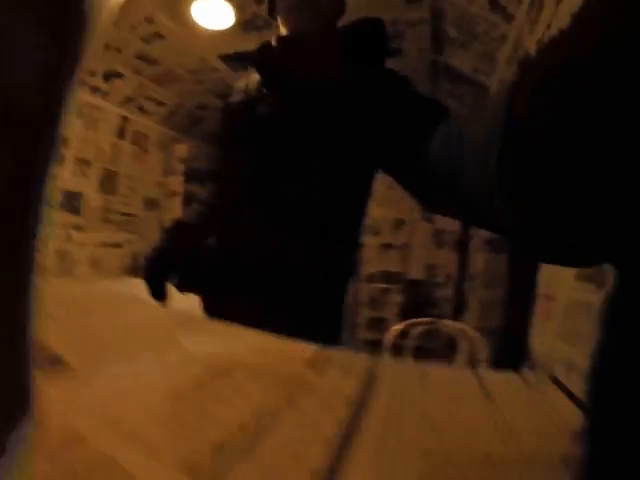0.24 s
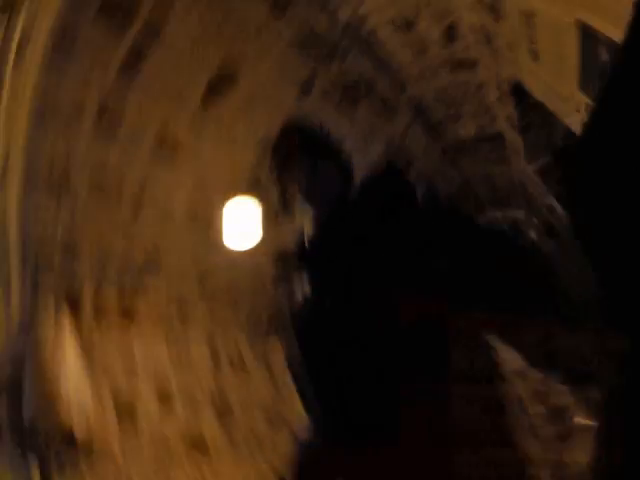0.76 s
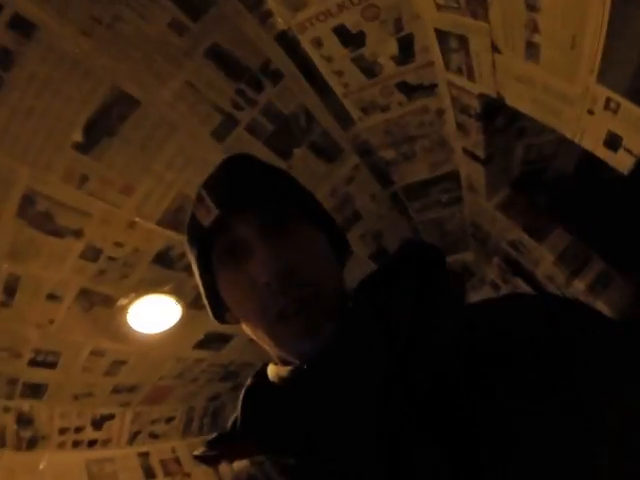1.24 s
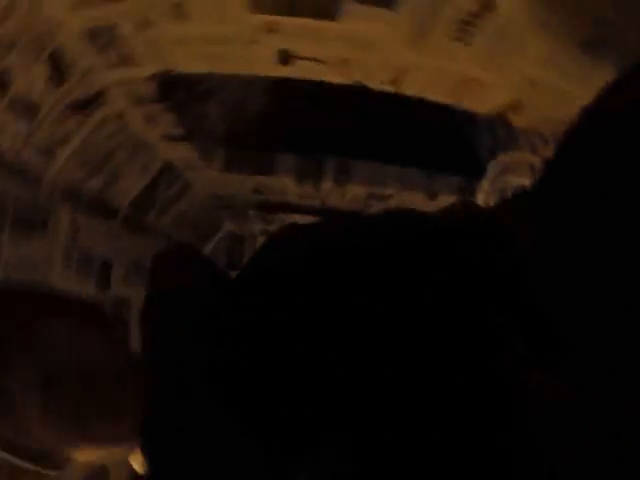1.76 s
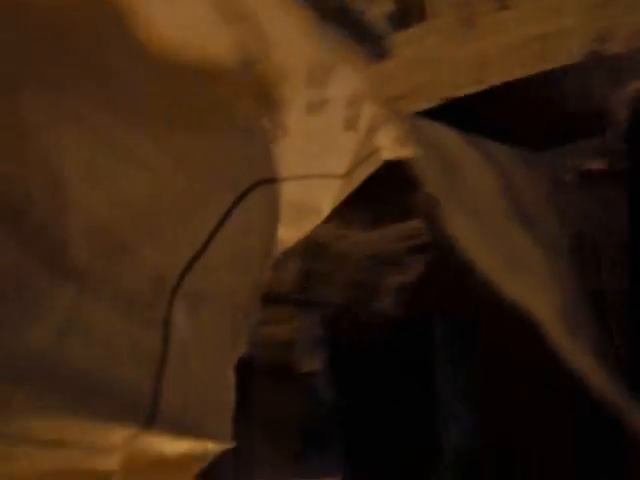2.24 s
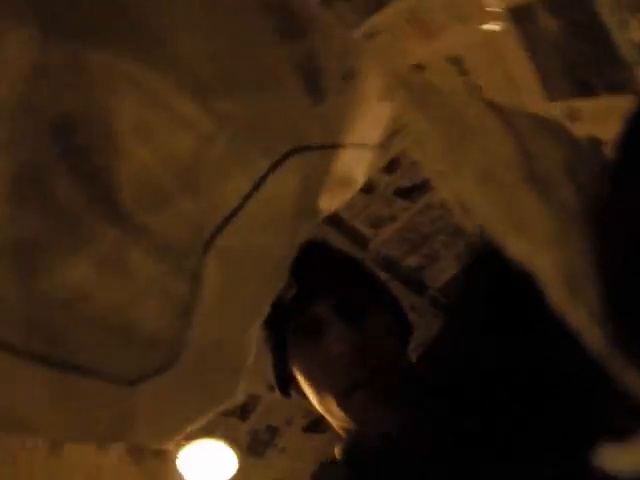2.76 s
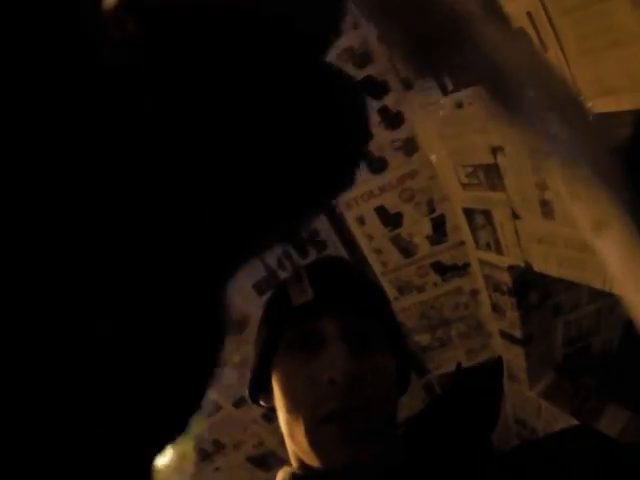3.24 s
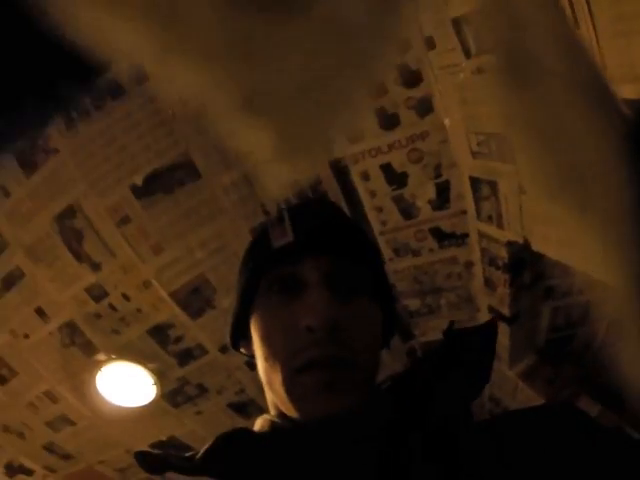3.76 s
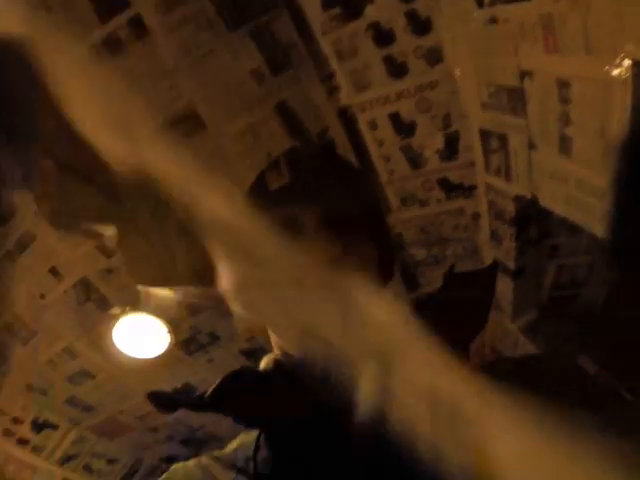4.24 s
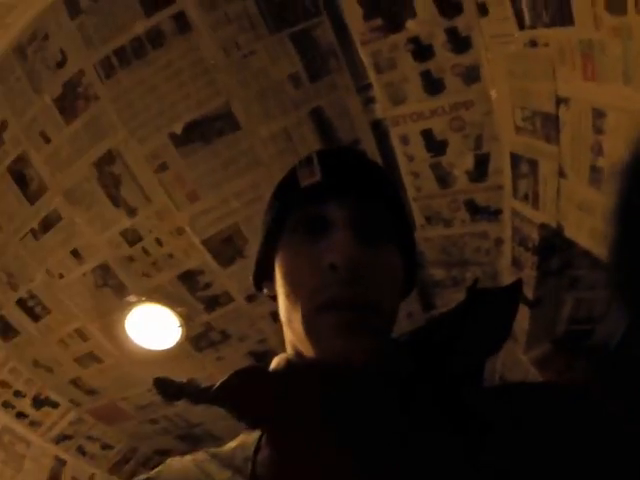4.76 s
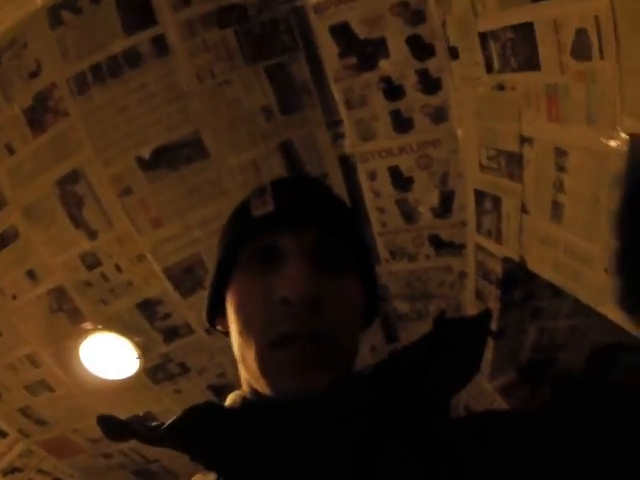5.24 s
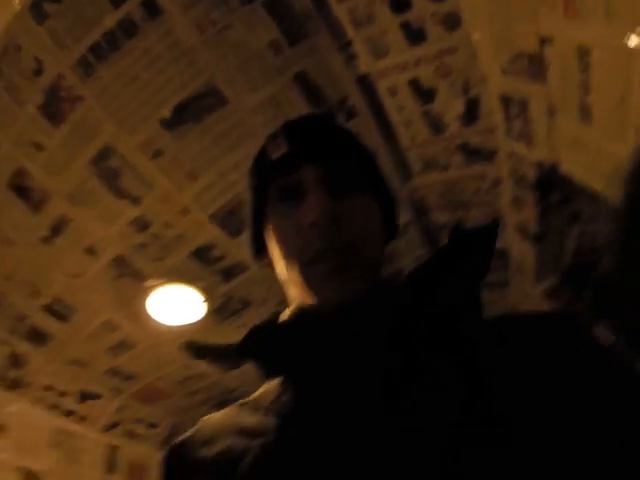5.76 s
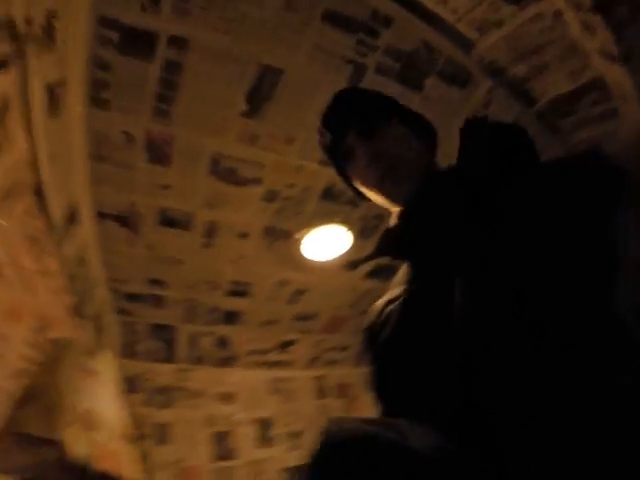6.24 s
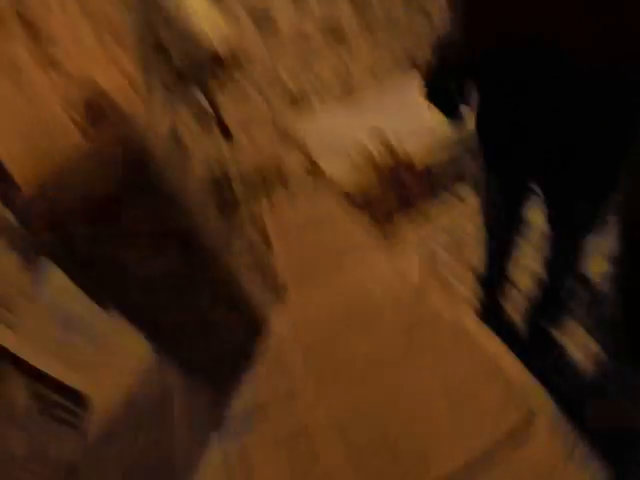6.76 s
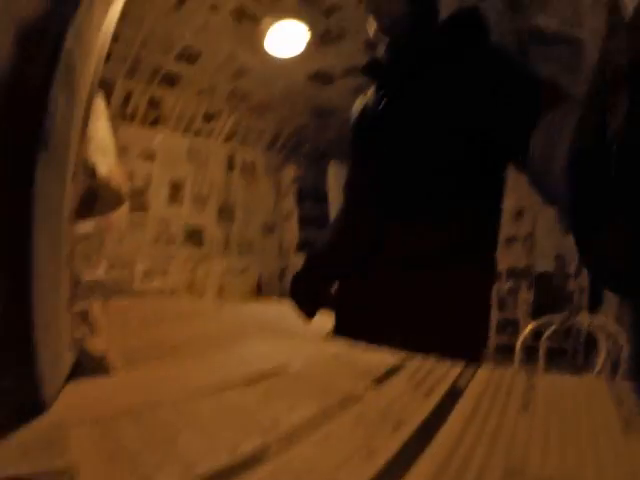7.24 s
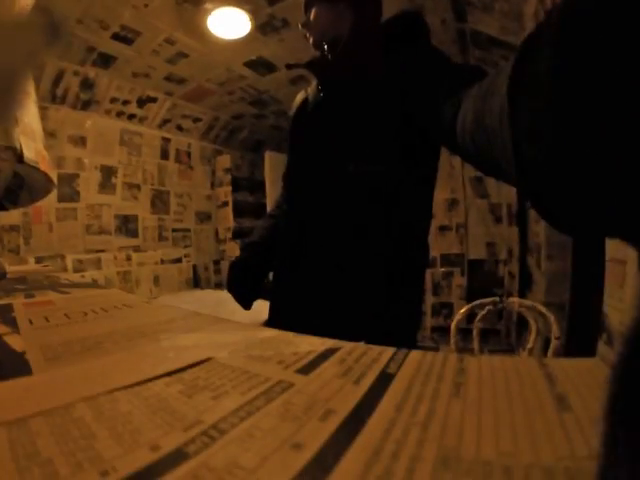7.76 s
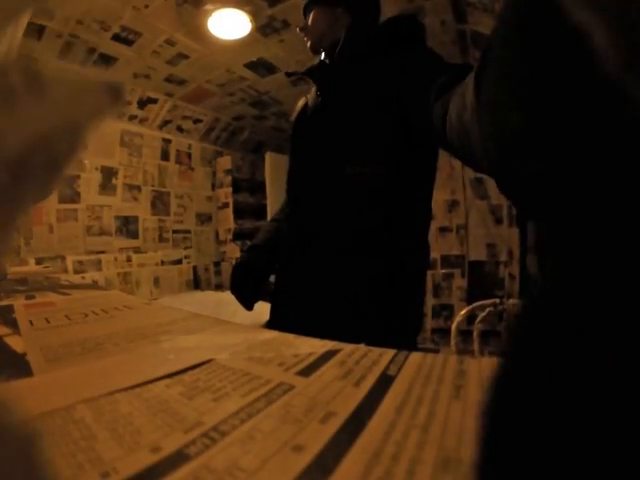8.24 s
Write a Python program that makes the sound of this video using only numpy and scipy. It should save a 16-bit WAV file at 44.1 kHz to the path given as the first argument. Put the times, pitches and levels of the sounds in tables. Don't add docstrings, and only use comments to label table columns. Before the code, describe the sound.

Dry paper crackles and scrapes within a hand's width of the microphone. Creases snap, bulges pop dully and stiff folds knock on the hollow housing, in irregular bursts with short near-quiet gaps. The middle is densest and duller as the port is covered; later come brighter, scattered rustles and bumps. Small room, faint hiss, background dipping after loud snaps.

```python
import sys
import numpy as np
from scipy import signal
from scipy.io import wavfile

SR = 44100
rng = np.random.default_rng(int(sys.argv[2]) if len(sys.argv) > 2 else 0)


def output_pcm(signal):
    pcm = np.clip(np.atleast_2d(signal).T, -1, 1) * 32767
    wavfile.write(sys.argv[1], SR, np.round(pcm).astype(np.int16))


def amplitude_ratio(level_db):
    exponent = np.asarray(level_db, float) / 20
    return 10 ** exponent


N = 374850


# peak time in seconds, housing thud in dB,
# sheet body in dB, crisp edge in dB, airy top in dB against the edge.
SNAPS = [(.243, -26, -13.5, -17, -7.5), (.855, -28, -33, -25.5, -23), (1.526, -21, -16, -18, -8.5),
         (1.751, -25.5, -25.5, -25, -6), (1.798, -20, -21.5, -26, -13), (2.035, -25.5, -31, -24, -21),
         (2.049, -10, -15, -18.5, -15), (2.155, -13, -19, -17, -15), (2.37, -29, -20.5, -22.5, -22),
         (2.448, -22.5, -23, -25.5, -11), (2.925, -29.5, -10.5, -34, -20), (3.0, -19, -5.5, -22, -26),
         (3.011, -25, -13, -20, -18), (3.047, -14, -14.5, -17, -11), (3.144, -14, -13.5, -15.5, -21),
         (3.196, -19, -6, -14, -21), (3.208, -45, -13, -18, -16), (3.771, -23, -17, -15, -16),
         (3.958, -27, -15.5, -27.5, -16), (4.427, -22, -16, -27, -23), (4.543, -6.5, -10.5, -15.5, -19),
         (4.91, -45, -23, -27, -14), (5.245, -34, -19, -27, -13), (5.294, -24, -23, -19.5, -13.5),
         (5.404, -25, -16, -28, -18), (6.379, -12, -13, -22, -15), (7.225, -16.5, -16, -19.5, -13),
         (7.236, -21.5, -23.5, -17.5, -25), (7.436, -33, -29, -19, -40), (7.459, -31.5, -21, -18, -11),
         (7.896, -6, -13, -22.5, -17), (4.653, -20, -31, -26, -5.5), (5.624, -17, -17.5, -30, -24),
         (.701, -18.5, -31, -38, -3), (7.202, -24.5, -36, -31.5, -6)]


def snaps():
    return [(*row, 1) for row in SNAPS]


# peak time in seconds, housing thud in dB, sheet body in dB,
# crisp edge in dB, airy top in dB against the edge.
FOLDS = [(.875, -33, -41, -29.5, -24), (1.584, -15.5, -20, -29.5, -14), (1.621, -10.5, -20, -27, -13),
         (1.663, -15, -23, -36, -2), (1.807, -14, -22, -24.5, -15), (1.943, -9.5, -17, -46, -17),
         (1.975, -30, -26.5, -35.5, -20), (2.267, -11, -14, -16.5, -16.5), (2.984, -21, -33, -31, -21),
         (3.08, -37, -15.5, -36.5, -10), (3.16, -42, -12.5, -21, -13), (3.172, -40, -17, -22.5, -15),
         (3.33, -32, -18.5, -22, -12), (3.616, -8, -8, -8, -17), (3.733, -20, -24, -29, -31),
         (4.095, -26, -22, -34, -6), (4.115, -24, -21, -29.5, -20), (4.282, -30, -14, -21, -18.5),
         (4.575, -1.5, -4, -10.5, -7), (5.06, -25.5, -29, -31, -11), (5.322, -24.5, -17.5, -30, -18),
         (5.384, -17.5, -23.5, -28.5, -22), (5.45, -18, -23, -33, -12), (5.672, -18.5, -29, -33.5, -13),
         (5.679, -19, -28, -30, -13), (5.697, -19.5, -27.5, -38, -21), (6.199, -24, -20, -27, -20),
         (6.357, -27.5, -34, -30.5, -15), (6.628, -30, -28.5, -37.5, -6), (6.648, -27, -28, -37, -15)]


def folds():
    return [(*row, 3.07) for row in FOLDS]


def dull(rows, swell_ms):
    return [(*row, -18, swell_ms) for row in rows]


# peak time in seconds, housing thud in dB, sheet body in dB, crisp edge in dB.
POPS = [(.809, -30, -24, -40), (1.52, -38, -23, -46), (1.682, -20, -26.5, -49), (1.866, -30, -25, -43),
        (2.087, -31, -25, -32), (2.225, -33, -24.5, -39), (2.417, -35.5, -24.5, -35),
        (2.426, -22.5, -24.5, -39), (3.113, -23, -26, -34), (3.265, -41, -27, -58),
        (3.442, -31, -24.5, -46), (3.727, -29, -24.5, -43), (3.984, -35.5, -31, -44),
        (4.397, -37, -29, -37), (4.411, -31.5, -25, -48), (4.468, -14, -21, -46), (4.916, -25, -27.5, -42),
        (4.923, -28, -22, -48), (5.033, -32, -28, -44), (5.237, -36, -26, -43), (5.528, -21.5, -26.5, -46),
        (5.662, -24, -22, -40), (6.399, -29, -20, -43), (6.48, -41, -21, -38), (6.853, -25.5, -26.5, -49),
        (7.481, -22.5, -19.5, -41), (8.415, -25, -24, -46), (1.124, -40, -37, -37), (2.636, -48, -34, -40),
        (3.645, -42, -39, -56), (3.673, -46, -39, -60), (3.848, -48, -38, -49), (3.907, -49.5, -38, -50),
        (7.816, -37, -29, -41), (1.205, -44, -38, -51), (5.091, -35, -35, -45), (4.188, -50, -40, -44),
        (3.381, -57, -42, -45), (2.009, -37.5, -27, -40), (4.631, -38, -42, -56), (3.563, -42, -37, -53)]


def pops():
    return dull(POPS, swell_ms=1.95)


# peak time in seconds, housing thud in dB, sheet body in dB,
# crisp edge in dB.
KNOCKS = [(.686, -22.5, -27, -44), (.721, -18.5, -34, -51), (.737, -27, -42, -40), (1.645, -24, -37, -38),
          (1.654, -19, -26, -30), (1.822, -16, -47, -46), (1.862, -22, -43, -48), (1.932, -29, -32, -28.5),
          (3.043, -6, -19, -19), (4.494, -24, -32, -41), (4.694, -22.5, -43, -48), (4.732, -17, -29.5, -36),
          (5.336, -23, -27, -30), (5.36, -20, -29, -27), (5.368, -21, -23, -44), (5.375, -24.5, -23, -40),
          (5.708, -33, -32, -41), (6.583, -26.5, -32, -38), (6.67, -21.5, -21.5, -38),
          (6.73, -25, -28.5, -43), (6.978, -19.5, -30.5, -33.5), (7.332, -44, -31, -39),
          (7.785, -25.5, -35, -49), (8.002, -15, -19, -31.5), (8.214, -20, -28, -42),
          (1.784, -23, -36, -31), (4.716, -27, -36, -41), (6.275, -27, -42, -47), (6.487, -30, -30, -35),
          (3.995, -31, -30, -46), (4.059, -35.5, -31, -44), (4.958, -30.5, -38, -51),
          (4.758, -32, -49, -49), (6.386, -16, -20, -28), (8.475, -32.5, -42, -42), (.528, -39, -49, -45),
          (2.533, -35, -40, -55), (8.054, -37, -50, -52), (8.282, -33.5, -36, -55), (3.541, -37, -46, -43),
          (6.517, -28.5, -43.5, -46), (7.035, -33, -46, -41), (4.833, -35, -38, -53),
          (7.835, -39, -36, -37)]


def knocks():
    return dull(KNOCKS, swell_ms=1.49)


# peak time in seconds, housing thud in dB, sheet body in dB,
# crisp edge in dB.
SHOVES = [(.416, -19, -36, -41), (1.505, -25, -29.5, -35.5), (1.604, -13, -27, -40),
          (1.667, -18.5, -41, -49), (4.001, -46, -32, -45), (4.257, -31, -29, -28),
          (5.348, -20.5, -26, -37), (5.51, -25, -29, -41), (5.556, -29, -31, -40), (5.688, -20.5, -39, -41),
          (5.772, -23, -40, -44), (6.955, -21, -35, -35), (7.148, -26.5, -35.5, -36),
          (7.373, -21.5, -50, -41), (.22, -34, -46, -47), (.378, -37.5, -58.5, -62), (.335, -40, -63, -62),
          (7.908, -30, -31, -44)]


def shoves():
    return dull(SHOVES, swell_ms=10.7)


# peak time in seconds, level in dB.
TICKS = [(.881, -35), (1.015, -31.5), (1.271, -37.5), (1.37, -46), (1.744, -30), (2.512, -33), (2.615, -36),
         (3.472, -42.5), (4.387, -35), (4.97, -36), (5.051, -26.5), (5.071, -28), (6.018, -49.5),
         (6.424, -28), (6.461, -30), (6.469, -30), (6.891, -34.5), (7.306, -32), (7.859, -29), (8.213, -28),
         (8.382, -40), (4.14, -36.5), (4.206, -40), (6.926, -35), (7.05, -39), (7.66, -42.5), (0.57, -42.5),
         (.632, -49), (2.947, -41.5), (6.806, -44), (7.313, -38), (.897, -43), (5.894, -60), (3.788, -48),
         (3.8, -50), (0.284, -51), (8.44, -45), (.43, -41), (7.886, -47), (1.912, -39), (7.496, -47.5),
         (7.507, -53), (8.491, -29)]


def ticks():
    return [(s, db - 6.5, db, db, -18, 1.27) for s, db in TICKS]


# frequency in Hz, level in dB, t60 in seconds.
HOUSING_MODES = [(115, -15, .06), (175, -11, .05), (240, -6, .04), (310, -3, .032), (400, -1.5, .032),
                 (478, -1, .04), (580, -3, .03), (700, -4, .025)]
# lowest mode in Hz, highest mode in Hz, tilt in dB per octave, t60 in seconds.
SHEET_BODY = (800, 2400, -1.5, .021)
CRISP_EDGE = (2400, 5600, -10, .013)
AIRY_TOP = (6000, 13000, -17, .008)


def creases():
    blows = snaps() + folds() + pops() + knocks() + shoves() + ticks()
    s, thud_db, body_db, edge_db, air_db, swell_ms = np.transpose(blows)[:, :, None]
    lead = 700
    t_ms = (np.arange(2 * lead) - lead) * 1000 / SR
    rise_ms = np.maximum(swell_ms - .7, .15)
    side_ms = np.where(t_ms < -.4, .42 * rise_ms, .7 * rise_ms + .15)
    swell = np.exp(-np.abs(t_ms + .4) / side_ms)
    slips = rng.standard_normal((len(s), len(t_ms))) ** 3 * swell

    body_modes = sheet_modes(*SHEET_BODY, count=14)
    edge_modes = sheet_modes(*CRISP_EDGE, count=11)
    air_modes = sheet_modes(*AIRY_TOP, count=10)
    thud = amplitude_ratio(thud_db - 2.5) * struck(HOUSING_MODES, slips, detune=.07, uneven_db=2)
    body = amplitude_ratio(body_db - .5) * struck(body_modes, slips, detune=.05, uneven_db=1.5)
    edge = amplitude_ratio(edge_db + .5) * struck(edge_modes, slips, detune=.05, uneven_db=1.5)
    air = amplitude_ratio(edge_db + air_db) * struck(air_modes, slips, detune=.05, uneven_db=2)

    out = np.zeros(N + 8 * lead)
    for start, hit in zip((s[:, 0] * SR).astype(int), thud + body + edge + air):
        out[start:start + len(hit)] += hit
    dulled = filtered(out[lead:lead + N], 4, 11500)
    return filtered(dulled, 2, 165, "high")


def sheet_modes(low_hz, high_hz, tilt_db, t60, count):
    hz = np.geomspace(low_hz, high_hz, count)
    octaves = np.log2(hz / low_hz)
    return np.transpose([hz, tilt_db * octaves, t60 * .72 ** octaves])


def struck(modes, bursts, detune, uneven_db):
    hz, level_db, t60 = np.transpose(modes)[:, None, :, None]
    chance = rng.standard_normal((len(bursts), 3, len(modes), 1))
    t = np.arange(int(.8 * SR * t60.max())) / SR
    tuned_hz = hz * np.exp(detune * chance[:, 0])
    tone = np.sign(chance[:, 2]) * np.sin(2 * np.pi * tuned_hz * t)
    decay = amplitude_ratio(level_db + uneven_db * chance[:, 1] - 60 * t / t60)
    response = np.sum(tone * decay, axis=1)
    padded = np.pad(response, [(0, 0), (0, 3300 - len(t))])
    sound = signal.fftconvolve(bursts, padded, axes=1)
    return sound / np.max(np.abs(sound), axis=1, keepdims=True)


# release in seconds,
# build-up in seconds per 10 dB, housing rub in dB, paper hiss in dB.
PULLS = [(0.22, 0.1, -50.5, -52.5), (0.428, 0.03, -37, -46), (0.4, .1, -54, -60), (1.275, 0.06, -47, -49),
         (1.5, 0.06, -46, -51), (0.12, 0.1, -52, -52), (8.14, 0.1, -58, -58), (6.52, .06, -42, -45),
         (.71, 0.04, -33.5, -47), (0.89, 0.12, -38, -44), (1.262, 0.4, -45, -48.5),
         (1.604, 0.0465, -32.5, -35), (1.789, -0.06, -28, -37), (2.911, 0.15, -50, -46.5),
         (3.155, 0.01, -27.5, -32.5), (3.572, 0.1, -54, -56), (3.945, 0.15, -55, -54),
         (4.108, 0.03, -32.5, -37), (4.275, 0.07, -44.5, -47.5), (4.085, .08, -47, -49),
         (4.95, -0.12, -39, -40.5), (4.645, .08, -50, -58), (5.792, 0.08, -40, -51), (6.135, .07, -62, -50),
         (6.778, 0.1, -54, -53), (6.657, 0.04, -38.5, -44.5), (6.967, 0.03, -40, -46),
         (7.232, 0.09, -41.5, -42.5), (7.44, 0.31, -46, -43), (5.41, 0.1, -41, -45),
         (7.886, 0.08, -40.5, -41.5), (6.313, .05, -48, -50), (.594, 0.12, -55, -51),
         (.96, -0.34, -44, -42.5), (1.035, -0.16, -48, -41.5), (4.22, .2, -53, -51), (6.595, .08, -43, -49),
         (7.997, 0.04, -57, -50), (7.31, 0.04, -53, -41.5), (2.64, 0.3, -54, -55), (3.462, 0.15, -55, -60)]
# jerk in seconds, dying time in seconds per 10 dB,
# housing rub in dB, paper hiss in dB.
SLIDES = [(0.0, 0.15, -49, -51), (0.099, -0.02, -43, -44), (.475, 0.1, -51, -53), (2.228, .035, -44, -48),
          (2.09, .06, -46, -51), (5.452, .05, -46, -49), (0.638, 0.4, -51, -47.5),
          (.79, 0.16, -45.5, -43.5), (1.29, 0.3, -52, -56.5), (1.63, 0.24, -38, -48),
          (1.82, 0.2, -40, -52.5), (2.264, 0.03, -45, -55), (2.45, 0.44, -51.5, -54.5),
          (2.997, 0.0741, -32, -44), (3.27, 0.07, -52.5, -61.5), (3.64, 0.3, -60, -66),
          (3.975, 0.12, -46, -50), (4.4, 0.12, -38, -50), (4.292, .07, -55, -58), (4.76, 0.12, -47.5, -53),
          (4.925, 0.16, -45, -49.5), (5.246, 0.15, -45, -54), (5.334, -0.06, -34, -41),
          (5.5, 0.11, -47, -56.5), (5.675, -0.04, -44, -53), (6.04, 12, -69, -75), (6.205, 0.025, -42, -45),
          (6.26, .04, -43, -51), (6.385, 0.12, -39, -44), (6.689, 0.02, -40.5, -46.5),
          (6.991, 0.03, -42.5, -49), (7.26, 0.2, -49, -48.5), (7.45, -0.27, -50, -50),
          (8.005, 0.14, -52, -51), (8.23, 1, -55, -61), (3.522, 0.04, -56, -57), (1.11, 0.1, -54.5, -53.5),
          (4.68, 0.04, -42.5, -49), (5.7, 0.05, -39.5, -46.5), (6.79, 0.13, -52.5, -51.5),
          (7.57, 0.6, -58.5, -57.5), (7.74, 0.5, -61, -74.5), (3.847, .12, -56, -56), (8.34, 3.5, -57, -56)]


def handling():
    let_go_s, jerk_s = .013, .014
    s, slow_s, *peaks_db = np.transpose(PULLS + SLIDES)
    pulled = np.arange(len(s)) < len(PULLS)
    rise_s = np.where(pulled, slow_s, jerk_s)
    fall_s = np.where(pulled, let_go_s, slow_s)
    return [swells(s, db, rise_s, fall_s, rest_db=-80) for db in peaks_db]


# frequency in Hz, level in dB per Hz.
HISS_SPECTRUM = [(410, -22), (700, -4), (1770, 1.5), (3840, -7), (5000, -13), (6480, -18), (10400, -25.5),
                 (13000, -33), (15000, -45)]


def hiss(level_db):
    crackle = rms_one(grains(1200 * amplitude_ratio(5.0 * drift(30)), spread_db=5))
    stray = rms_one(grains(70 * amplitude_ratio(5.0 * drift(8)), spread_db=4))
    white = rng.standard_normal((2, N)) + 1.2 * crackle + .3 * stray
    gusts = amplitude_ratio(1.9 * drift(45))
    fibres = rms_one(coloured(white, HISS_SPECTRUM, patchy_db=1, rate=25) * gusts)
    low = filtered(fibres, 1, 3470)
    bright_db = 0.18 * (level_db + 50.5)
    return amplitude_ratio(level_db) * (low + amplitude_ratio(bright_db) * (fibres - low))


def rub(level_db):
    slips = grains(2500 * amplitude_ratio(3.0 * drift(25)), spread_db=3.5)
    modes = np.vstack([HOUSING_MODES, sheet_modes(820, 1640, -10.0, 0.03, count=5)])
    dealt = rng.integers(0, len(modes), N)
    body = 0
    for k, (hz, db, t60) in enumerate(modes):
        body = body + amplitude_ratio(db) * ring(slips * (dealt == k) + 1e-18, hz, 0.9 * t60)
    body = filtered(body, 2, [250, 1800], "band")
    return amplitude_ratio(level_db) * rms_one(body * amplitude_ratio(1.54 * drift(21.6)))


# time in seconds, level above 6 kHz in dB.
UNCOVERED = [(0, 3), (.6, 7), (.72, 7.5), (.85, 1.5), (1.1, 2), (1.9, -2), (2.4, -3), (3.3, -8.5),
             (4.4, -12), (4.7, -6.5), (5.5, -1), (5.7, 2.5), (6.0, -1.5), (6.6, 3), (7.2, 5), (7.9, 2.5),
             (8.05, 2.5), (8.5, 0.5)]
# resonance in Hz,
# width in Hz, level added in dB.
RESONANCES = [(478, 36, -10), (882, 31, -9), (3600, 740, -6)]


def port(x):
    for hz, width_hz, db in RESONANCES:
        x = x + amplitude_ratio(db) * signal.lfilter(*signal.iirpeak(hz, hz / width_hz, fs=SR), x)
    s, top_db = np.transpose(UNCOVERED)
    low = filtered(x, 1, 6000)
    return low + amplitude_ratio(np.interp(np.arange(N) / SR, s, top_db)) * (x - low)


# start in seconds, level in dB, answering low mode in Hz.
THUMPS = [(1.512, -26, 95), (4.106, -25, 84), (5.449, -24, 171), (6.968, -28.5, 64), (7.245, -28, 114),
          (1.944, -32, 125), (8.218, -23, 196), (3.2, -32, 110), (2.966, -30, 90), (0.82, -39, 80),
          (.435, -33, 87)]


def thumps():
    palm_ms, cycles = 3, 16
    out = np.zeros(N)
    push = np.hanning(int(palm_ms * SR / 500))
    for s, db, hz in THUMPS:
        after = out[int(s * SR):int(s * SR) + SR // 2]
        after += amplitude_ratio(db) * ring(signal.unit_impulse(len(after)), hz, cycles / hz)
    return np.convolve(out, push / push.sum())[:N]


# peak time in seconds, level in dB, dying time in seconds per 10 dB.
JOLTS = [(0.0, -57.5, 2.5), (.415, -45, 0.27), (.756, -44, 0.1), (1.509, -39, 0.22), (1.962, -34, -0.38),
         (2.44, -50, .03), (2.975, -45.5, 0.12), (3.14, -44, 0.07), (5.05, -52, 0.03), (1.1, -55, 0.1),
         (6.08, -63, .2), (3.28, -45.5, -0.06), (3.4, -50, -0.1), (3.58, -52, -0.2), (2.58, -52, .02),
         (6.66, -52, 0.06), (4.121, -45, 0.06), (4.24, -48, .04), (4.424, -46, 0.23), (4.72, -54.5, 0.3),
         (5.328, -53, 0.16), (5.72, -47, 0.11), (6.28, -53.5, 0.5), (6.98, -50.5, 0.4), (7.377, -54.5, 0.2),
         (7.75, -55, 0.5), (8.4, -53.5, 5)]


def rumble():
    s, jolt_db, dying_s = np.transpose(JOLTS)
    level_db = swells(s, jolt_db, .018, dying_s, rest_db=-92)
    lumps = rng.standard_normal(N) * amplitude_ratio(4.0 * drift(9))
    grip = rms_one(ring(rng.standard_normal(N), hz=80.5, t60=0.22))
    lows = rms_one(filtered(lumps, 2, [35, 125], "band"))
    return amplitude_ratio(level_db) * rms_one(lows + 0.6 * grip)


# frequency in Hz, level in dB per Hz.
ROOM_SPECTRUM = [(18, -45.5), (30, -29), (66, -13), (134, -16), (822, -15.5), (9000, -15), (14000, -35)]


def room_tone():
    white = rng.standard_normal((2, N))
    return amplitude_ratio(-84) * coloured(white, ROOM_SPECTRUM, patchy_db=3.0, rate=3.9)


def rms_one(x):
    return x / np.sqrt(np.mean(x ** 2) + 1e-20)


def filtered(x, order, hz, kind="low"):
    return signal.sosfilt(signal.butter(order, hz, kind, fs=SR, output="sos"), x)


def drift(rate):
    r = np.exp(-40 * np.pi * rate / SR)
    coarse = rng.standard_normal(N // 20 + 2002)
    slow = signal.lfilter([1], [1, -2 * r, r * r], coarse)[2000:]
    return np.interp(np.arange(N) / 20, np.arange(len(slow)), rms_one(slow))


def grains(per_s, spread_db):
    sizes = amplitude_ratio(spread_db * np.minimum(rng.exponential(1, N), 5))
    signs = rng.choice([-1, 1], N)
    return sizes * signs * (rng.random(N) < per_s / SR) + 1e-18


def ring(clicks, hz, t60):
    r = amplitude_ratio(-60 / (t60 * SR))
    w = 2 * np.pi * hz / SR
    return signal.lfilter([0, np.sin(w)], [1, -2 * r * np.cos(w), r * r], clicks)


def coloured(white, spectrum, patchy_db, rate):
    hz, level_db = np.transpose(spectrum)
    edges = np.geomspace(hz[0], hz[-1], int(3 * np.log2(hz[-1] / hz[0])) + 1)
    out = 0
    for k, (low, high) in enumerate(zip(edges, edges[1:])):
        band = filtered(white[k % 2], 2, [low, high], "band")
        band_db = np.interp(np.log(low * high) / 2, np.log(hz), level_db)
        out = out + band * amplitude_ratio(band_db + patchy_db * drift(rate))
    return rms_one(out)


def swells(s, peak_db, rise_s, fall_s, rest_db):
    t = np.arange(0, N + 64, 64)[:, None] / SR - s
    side_s = np.maximum(np.where(t < 0, rise_s, fall_s), 1e-3)
    level_db = peak_db - 10 * np.abs(t) / side_s
    total_db = 10 * np.log10(np.sum(amplitude_ratio(2 * level_db), axis=1) + amplitude_ratio(2 * rest_db))
    return np.interp(np.arange(N) / 64, np.arange(len(t)), total_db)


def scene():
    rub_db, hiss_db = handling()
    paper = port(creases() + hiss(hiss_db) + rub(rub_db))
    return (paper + thumps() + rumble() + room_tone())[None]


def band_limit(x):
    return signal.sosfilt(signal.butter(12, 16450, fs=SR, output="sos"), x)


def record(dry):
    limit_db, release_db_per_s, ceiling = -14.5, 153, .235
    over_db = np.maximum(20 * np.log10(np.abs(dry) + 1e-9) - limit_db, 0)
    climb = release_db_per_s * np.arange(N) / SR
    held_db = np.maximum.accumulate(over_db + climb, axis=1) - climb
    ducked = dry * amplitude_ratio(-signal.lfilter([.02], [1, -.98], held_db))
    capped = ceiling * np.tanh((np.abs(ducked) / ceiling) ** 4) ** .25 * np.sign(ducked)
    top_cut = signal.cheby2(10, 50, 16400, fs=SR, output="sos")
    mix = signal.sosfilt(top_cut, capped)
    return band_limit(mix)


dry = scene()
out = record(dry)
output_pcm(out)
```